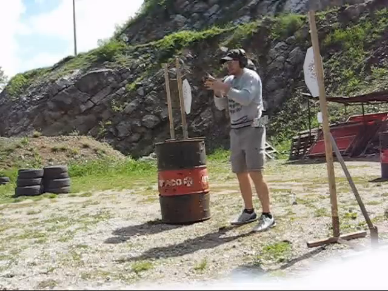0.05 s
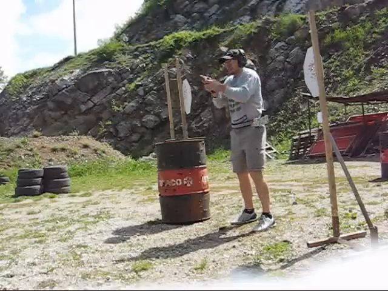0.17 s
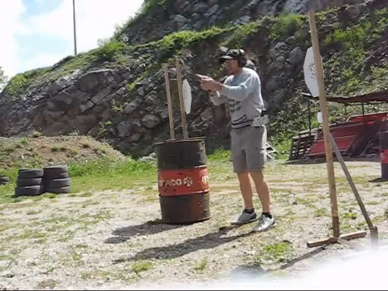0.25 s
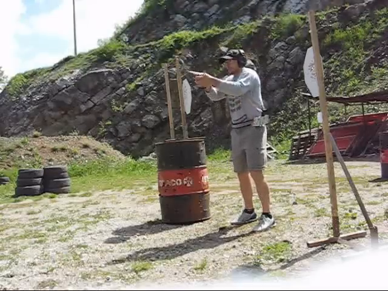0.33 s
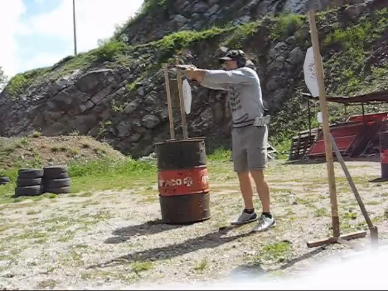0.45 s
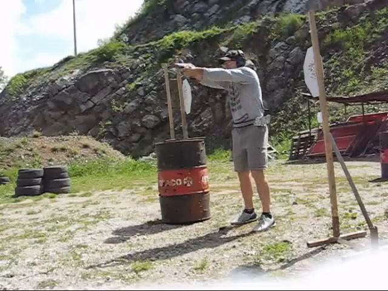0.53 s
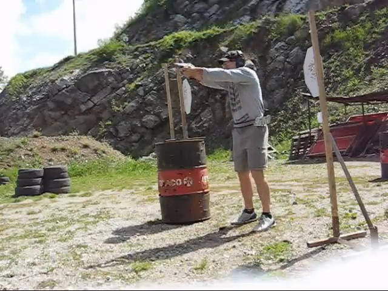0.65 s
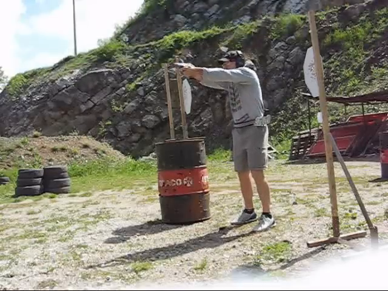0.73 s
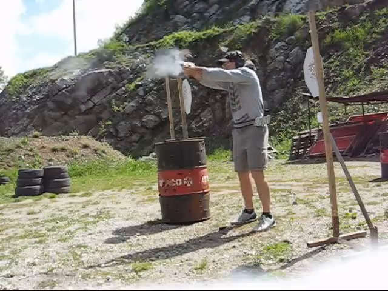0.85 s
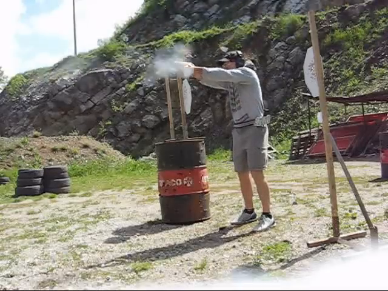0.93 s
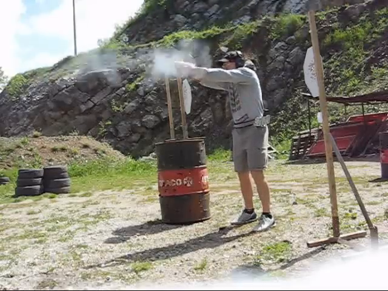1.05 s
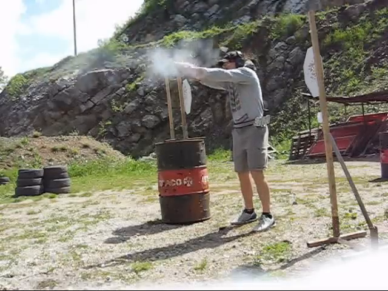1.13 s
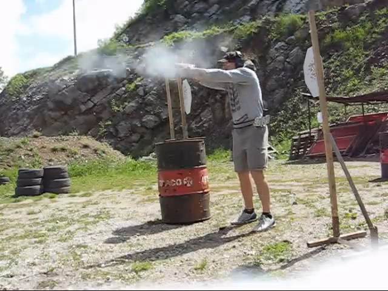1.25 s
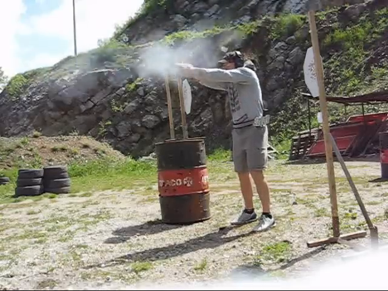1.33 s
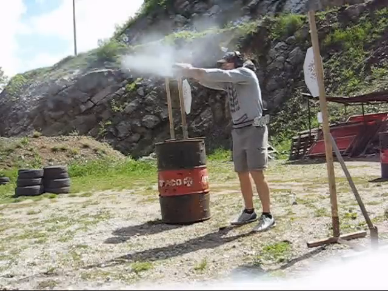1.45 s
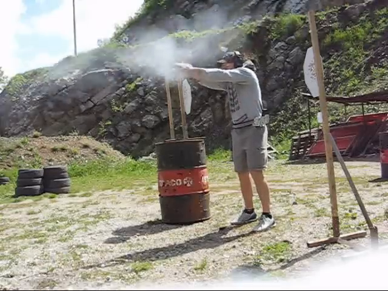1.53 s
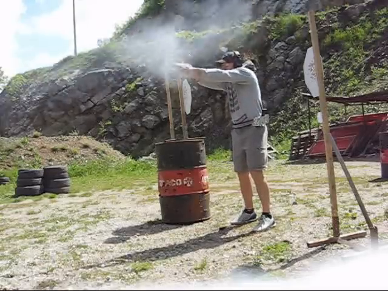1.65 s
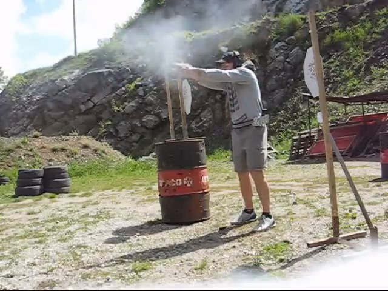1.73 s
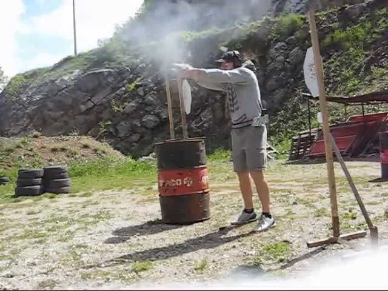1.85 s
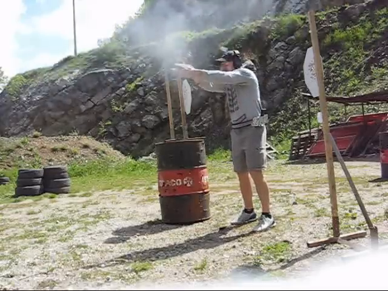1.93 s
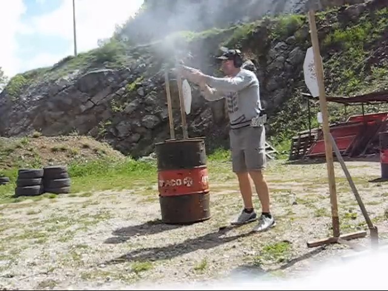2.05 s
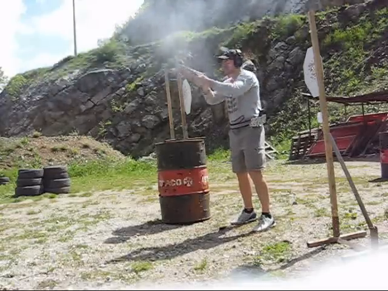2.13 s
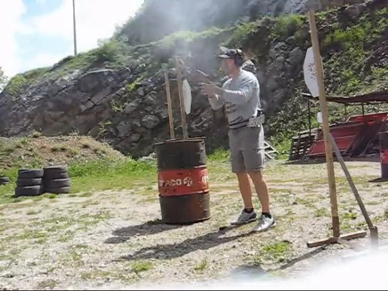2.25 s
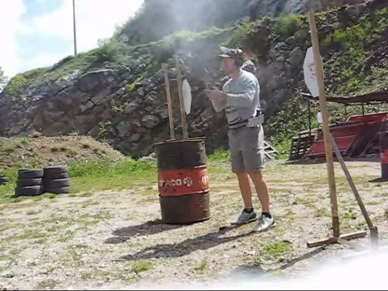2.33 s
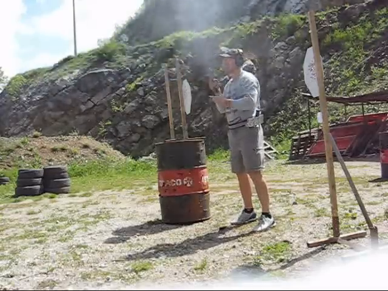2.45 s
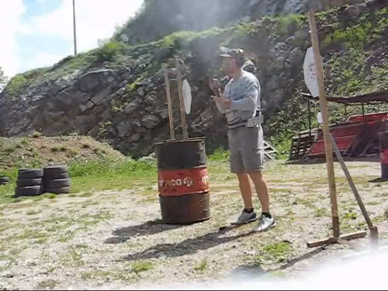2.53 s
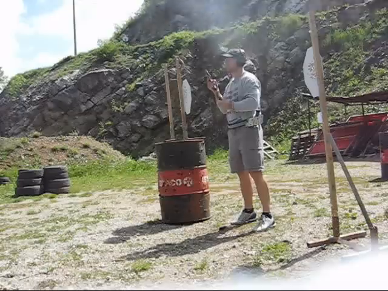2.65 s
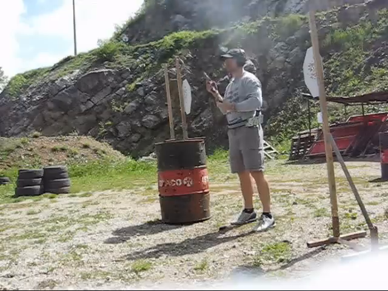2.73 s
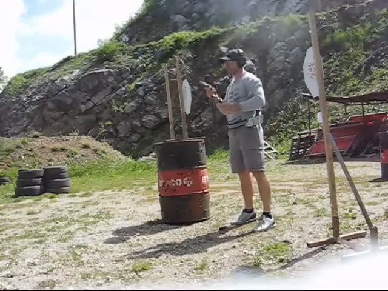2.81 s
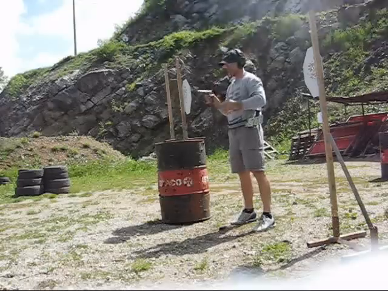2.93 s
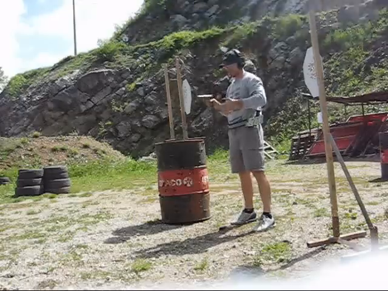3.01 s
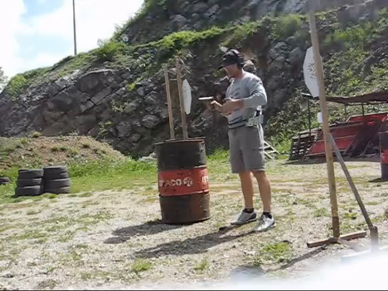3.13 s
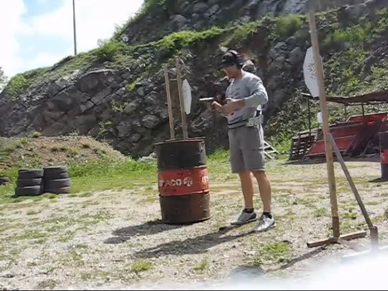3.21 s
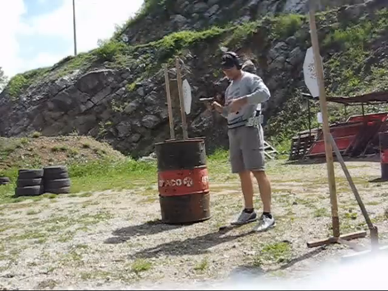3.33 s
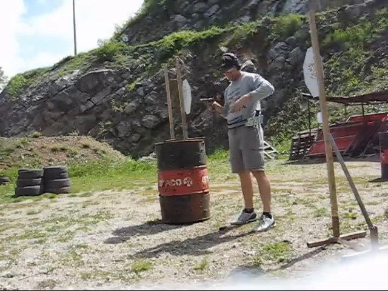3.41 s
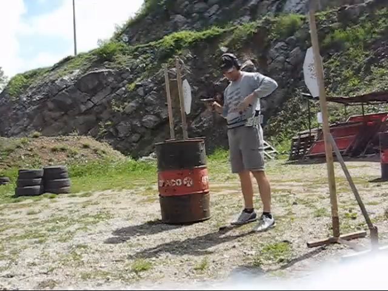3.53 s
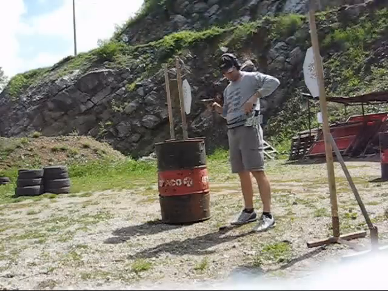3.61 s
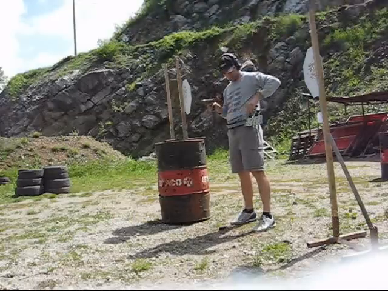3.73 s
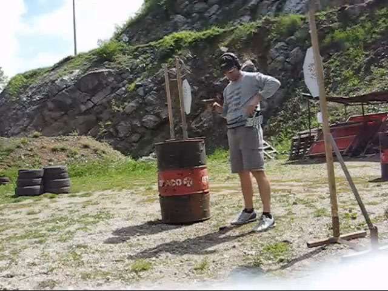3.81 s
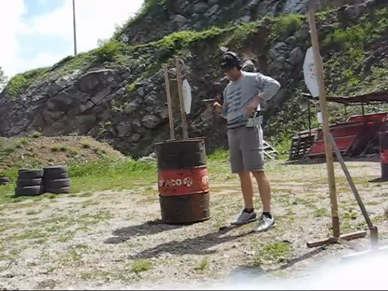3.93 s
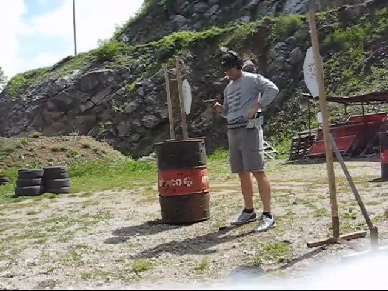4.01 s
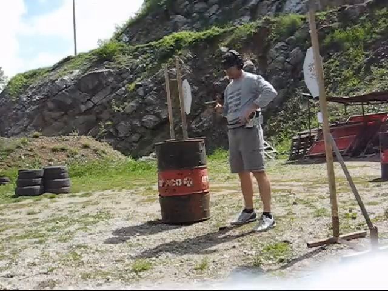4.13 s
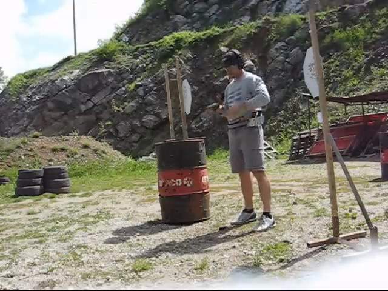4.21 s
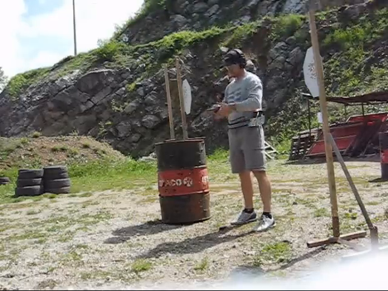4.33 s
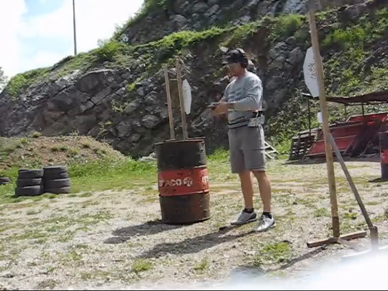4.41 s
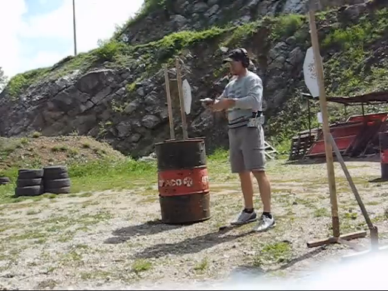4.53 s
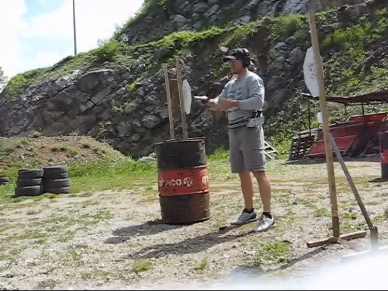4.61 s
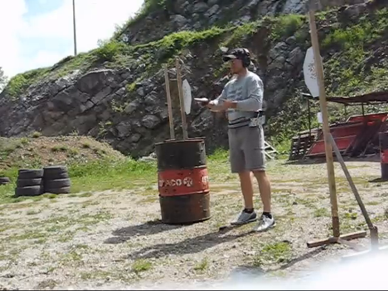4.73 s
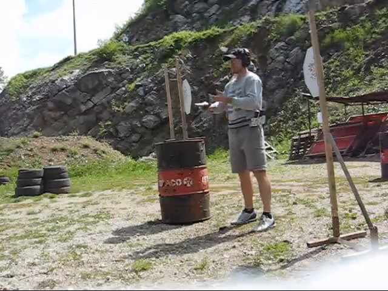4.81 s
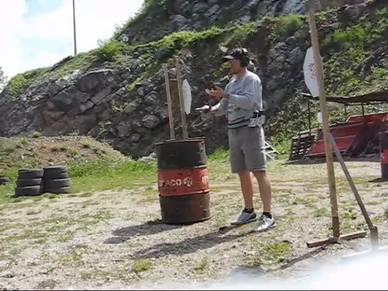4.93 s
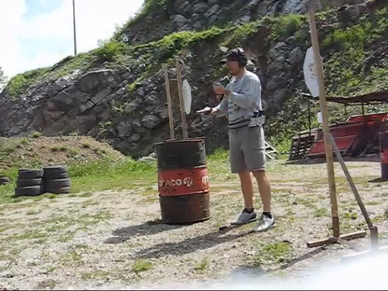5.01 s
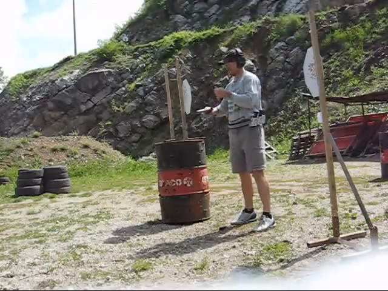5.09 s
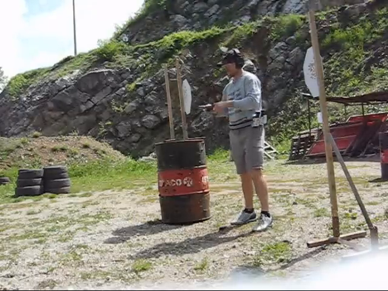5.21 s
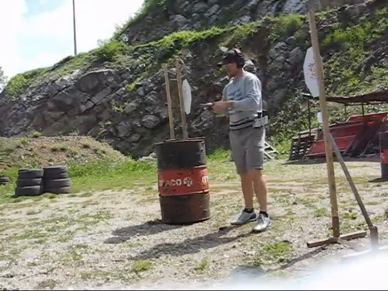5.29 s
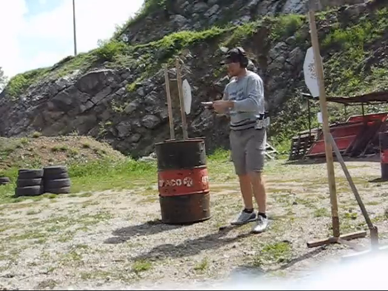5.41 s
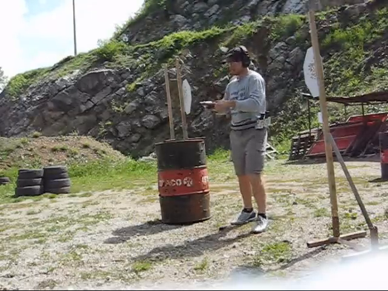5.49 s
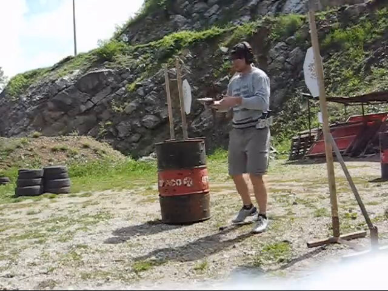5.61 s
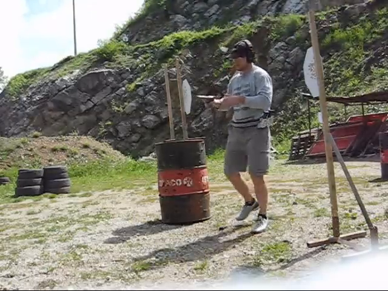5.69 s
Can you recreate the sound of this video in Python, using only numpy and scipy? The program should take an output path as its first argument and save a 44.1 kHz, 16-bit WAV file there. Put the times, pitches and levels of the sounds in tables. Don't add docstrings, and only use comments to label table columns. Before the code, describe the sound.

Gun parts click, four evenly spaced overloaded gunshots blast, a far rock face roars back, and gritty handling clicks follow in light wind.

```python
import sys
import numpy as np
from scipy import signal
from scipy.fft import rfft, irfft
from scipy.io import wavfile
from scipy.ndimage import uniform_filter1d

SR = 44100
rng = np.random.default_rng(int(sys.argv[2]) if len(sys.argv) > 2 else 0)


def store_wav(level_fs):
    pcm = np.round(np.clip(np.atleast_2d(level_fs), -1, 1) * 32767)
    wavfile.write(sys.argv[1], SR, pcm.T.astype(np.int16))


def attenuation_scalar(level_db):
    decades = np.asarray(level_db, float) / 20
    return 10 ** decades


N = 253562

# [t/s, strength/dB]
SHOTS = [
    (0.9226, 0),
    (1.1369, 0),
    (1.3515, 0),
    (1.5596, 0),
]


def white():
    return rng.standard_normal(N)


def unit(x):
    return x / np.sqrt(np.mean(x ** 2))


def band(x, lo_hz, hi_hz, order=2):
    return signal.sosfilt(signal.butter(order, [lo_hz, hi_hz], "band", fs=SR, output="sos"), x)


def colour(x, table):
    hz, db = np.transpose(table)
    grid = np.maximum(np.arange(2049) * SR / 4096, 1)
    log_gain = np.log(attenuation_scalar(np.interp(np.log(grid), np.log(hz), db)))
    cepstrum = irfft(log_gain)
    cepstrum[1:2048] *= 2
    cepstrum[2049:] = 0
    response = irfft(np.exp(rfft(cepstrum)))
    return signal.fftconvolve(x, response)[:len(x)]


def walk(rate):
    k = int(SR / rate)
    steps = np.repeat(rng.standard_normal(N // k + 1), k)
    return unit(uniform_filter1d(steps, k)[:N])


def scatter(table, treble_db, lumpy_db, bass_db=0, bass_hz=600, split_hz=1500):
    x = unit(colour(white() * attenuation_scalar(lumpy_db * walk(300)), table))
    low = signal.filtfilt(*signal.butter(1, split_hz, fs=SR), x)
    bass = signal.filtfilt(*signal.butter(2, bass_hz, fs=SR), low)
    middle = low - bass
    treble = x - low
    return bass * attenuation_scalar(bass_db) + middle + treble * attenuation_scalar(treble_db)


def add(out, s, x):
    i = int(s * SR)
    out[i:i + len(x)] += x[:N - i]


def ducking():
    # [t/s, drop/dB, recovery/s]
    drops = [(0.071, 6, 0.52), (0.322, 3, 0.55), (4.12, 10.5, 0.448), (4.574, 6.5, 0.529),
             (4.636, 7.5, 0.99), (5.60, 3, .4), (5.654, 7, .6), (5.733, 40, 1)]
    t = np.arange(N) / SR
    drop_db = 0
    for s, db, recovery_s in drops:
        onset = np.clip((t - s) / .004, 0, 1)
        recovery = np.clip(1 - (t - s) / recovery_s, 0, 1)
        drop_db = drop_db + db * onset * recovery
    return attenuation_scalar(-drop_db)


def camera():
    # [f/Hz, level/dB rms]
    motor = [
        (156.1, -57.5),
        (1184, -76),
        (2342, -68.5),
    ]
    t = np.arange(N) / SR
    hum = sum(np.sqrt(2) * attenuation_scalar(db) * np.sin(2 * np.pi * hz * t) for hz, db in motor)
    since = t - SHOTS[0][0]
    dip_db = 14 * (since > 0) * np.clip(1 - since / 2, 0, 1)
    hiss = unit(band(white(), 300, 4000, order=1)) * attenuation_scalar(-62 + 2.0 * walk(35))
    gain = ducking()
    return hum * attenuation_scalar(-dip_db) * gain ** .3 + hiss * gain ** .04


def wind():
    # [t/s, peak level/dB, time to fade by 20 dB/s]; a negative time swaps rise and fade
    gusts = [(.02, -70.5, -2), (.315, -54, 0.1), (.7, -66, 2.7), (1.8, -60.5, 0.7), (2.27, -37, .04),
             (2.35, -34, -0.4), (2.44, -35, 0.5), (2.61, -35.5, 0.21), (2.72, -49.5, .5), (3.0, -39, 0.32),
             (3.22, -40.5, .15), (3.439, -33, -0.06), (3.52, -47.5, -2), (3.74, -45, 0.73),
             (3.87, -41.5, 0.64), (3.989, -43.5, 0.6), (4.12, -47, -0.6), (4.21, -48, 0.2178),
             (4.359, -52, -0.28), (4.5, -53, 0.34), (4.64, -54.5, -0.52), (4.9, -54, .03),
             (5.005, -44.5, 0.1), (5.108, -45, 0.02), (5.23, -51.5, 0.1), (5.385, -44.5, 0.61),
             (5.5, -49.5, 0.9), (5.66, -57.5, .03)]
    # [t/s, peak level/dB, f/Hz]
    thumps = [(2.258, -36, 68.8), (2.337, -34.5, 78.5), (2.447, -37, 93.5), (2.597, -31.5, 52.9),
              (3.018, -30.5, 78), (3.179, -22.5, 59.8), (3.441, -29.5, 37.84), (4.21, -37, 53.44),
              (4.877, -42, 72), (4.988, -35, 89.4), (5.098, -42, 63.3), (5.231, -47, 52.7),
              (5.376, -32, 108)]
    rise_share, calm_db = .45, -84
    rumble = unit(band(white() * attenuation_scalar(4 * walk(30)), 22, 120))
    t = np.arange(N) / SR
    swell_db = []
    for s, db, fade_s in gusts:
        away = np.maximum((t - s) / fade_s, (s - t) / (fade_s * rise_share))
        swell_db.append(db - 20 * away)
    out = rumble * attenuation_scalar(np.maximum(np.max(swell_db, axis=0), calm_db))
    for s, db, hz in thumps:
        t = np.arange(int(1.8 * SR / hz)) / SR
        add(out, s, -attenuation_scalar(db) * np.sin(2 * np.pi * hz * t) * np.hanning(len(t)))
    return out


def scrapes():
    # [start t/s, end t/s, level/dB]
    slides = [(0, 0.054, -45.5), (3.96, 4.114, -47), (4.509, 4.531, -43), (4.648, 4.728, -57.5),
              (5.404, 5.541, -53.5), (5.647, 5.681, -49)]
    swell_db = 8.5
    t = np.arange(N) / SR
    gain = 0
    for start, end, db in slides:
        left = np.clip((end - t) / (end - start), 0, 1)
        gain = gain + (t > start) * (t < end) * attenuation_scalar(db - swell_db * left)
    return gain * unit(band(white() * attenuation_scalar(3 * walk(150)), 1970, 5460))


def clicks():
    # [t/s, peak level/dB, ring f/Hz, time to fade by 60 dB/s]
    ticks = [(.0523, -20.5, 4595, 0.049), (.0568, -22.5, 5293, 0.091), (.0709, -26, 5300, 0.04),
             (.2804, -28, 2400, 0.055), (.2959, -20, 4470, 0.038), (.3054, -16.5, 4140, 0.026),
             (.3111, -19, 3938, 0.07), (3.2557, -23.5, 2530, 0.034), (3.8016, -13.5, 3370, 0.013),
             (3.803, -22, 1670, .04), (3.9025, -19.5, 4160, 0.015), (3.904, -24, 1550, 0.0476),
             (4.115, -16.5, 4050, 0.023), (4.5264, -20, 4060, 0.033), (4.5404, -35.5, 2070, 0.14),
             (4.57, -14.5, 2240, 0.021), (4.632, -29.5, 3420, .03), (4.648, -34, 2200, .063),
             (5.4848, -37, 2550, .04), (5.53, -30.5, 2930, 0.036), (5.5425, -19, 2320, 0.018),
             (5.559, -28, 2240, 0.067), (5.597, -15.5, 2184, 0.028), (5.6308, -32, 4040, .036),
             (5.6502, -19.5, 3894, .041), (5.6668, -34.5, 4270, 0.0558)]
    # [t/s, peak level/dB, ring f/Hz, time to fade by 60 dB/s]
    clacks = [(.0662, -18, 3730, 0.015), (.319, -19.5, 2328, 0.019), (.9168, -32, 3500, .05),
              (2.5313, -22.5, 4500, 0.056), (2.5445, -21.5, 2480, 0.035), (3.7904, -26.5, 2360, 0.0136),
              (3.921, -35, 3346, 0.036), (4.5174, -33.5, 4350, 0.046), (4.558, -21.5, 4328, 0.021),
              (4.6344, -18, 2840, 0.017), (4.636, -23, 1424, 0.034), (5.307, -31, 718, 0.055),
              (5.3243, -25.5, 2742, 0.022), (5.425, -36, 1023, .053), (5.447, -28, 1000, 0.031),
              (5.6414, -31, 4404, 0.0366), (5.6544, -23, 4080, 0.0275)]
    # [f/Hz, level over the crack/dB]
    steel = [
        (2250, -14.5),
        (3400, -5),
        (4350, -4.5),
    ]
    out = np.zeros(N)
    t = np.arange(3000) / SR
    for table, body_db, hard_db in [(ticks, -13, -7), (clacks, -5, -8)]:
        for s, db, hz, t60 in table:
            a, b, c = rng.standard_normal((3, len(t)))
            crack_db = hard_db + 19.5 * min(np.log2(hz / 1500), 0)
            fade = attenuation_scalar(-60 * t / max(t60, .005)) * np.minimum(t / 0.000087, 1)
            frame = sum(unit(band(a, f * .96, f * 1.04, order=1)) * attenuation_scalar(g) for f, g in steel)
            crack = (unit(band(a, 1500, 7000)) + frame) * attenuation_scalar(crack_db - 4.5)
            pure_ring = np.sin(2 * np.pi * hz * t) * attenuation_scalar(-9.5)
            rough_ring = unit(band(b, hz * .94, hz * 1.06, order=1)) * attenuation_scalar(-12.5)
            body = unit(band(c, 380, 1050, order=1)) * attenuation_scalar(body_db - 3.0)
            add(out, s, attenuation_scalar(db) * fade * (crack + pure_ring + rough_ring + body))
    return out


def valley():
    # [t/s, level/dB]
    roar = [(0.0, -44.5), (0.51, -47.5), (0.75, -44.5), (0.92, -47), (0.98, -55), (1.1, -35.5), (1.28, -36),
            (1.63, -48), (1.8, -38), (1.88, -26), (2.18, -23.5), (2.56, -25), (3.06, -35.5), (4.03, -48),
            (4.7, -50.5), (4.95, -57), (5.5, -52), (5.75, -66.5)]
    # [f/Hz, level/dB per Hz]
    rock = [(150, -49), (250, -22), (442, -7.5), (523, -3.5), (634, -4), (822, -1.5), (985, -11),
            (1150, -9), (1530, -15), (2310, -20), (5500, -34), (7150, -72), (12100, -120)]
    # [t/s, rise/dB, fade/s]
    surges = [
        (2.19, 6, 0.33),
        (2.418, 9.5, 0.009),
    ]
    loud_db = -25.5
    t = np.arange(N) / SR
    surge_db = sum(db * (t > s) * np.exp(-abs(t - s) / fade) for s, db, fade in surges)
    roar_s, roar_db = np.transpose(roar)
    over_db = np.interp(t, roar_s, roar_db) - loud_db
    front_db = 4.5 * np.exp(-abs(t - 1.9) / 0.73)
    rustle_db = .5 * np.clip(-12 - over_db, 0, 12)
    treble_db = -3 + rustle_db + front_db - surge_db
    bass_db = -1 - 0.19 * over_db - .5 * surge_db
    level_db = loud_db + over_db + surge_db
    patchy_db = 0.7 * walk(25) + 0.53 * walk(70)
    return scatter(rock, treble_db, 1.2, bass_db) * attenuation_scalar(level_db + patchy_db)


def sizzle():
    late_swell = (1.84, -2)
    t60 = 1.3
    t = np.arange(N) / SR
    power = sum((t > s) * attenuation_scalar(db - 60 * abs(t - s) / t60) ** 2 for s, db in [*SHOTS, late_swell])
    return np.sqrt(power) * attenuation_scalar(-36.5 + 2.0 * walk(60)) * unit(band(white(), 2840, 6500))


def near_echo_db():
    # [delay/s, level/dB, hold/s, time to fade by 60 dB/s]
    returns = [(0, -7, .0285, .018), (.029, -16, .011, 0.0283), (0.047, -20.5, 0.003, 0.16),
               (0.074, -26, .01, 0.51), (0.131, -31, 0.044, 0.2), (.195, -22.5, .002, .06),
               (0.202, -31.5, 0.0056, 0.9)]
    t = np.arange(N) / SR
    power = 0
    for s, db, hold, t60 in returns:
        rise = np.clip((t - s) / .002 + (s == 0), 0, 1)
        fade_db = 60 * np.clip(t - s - hold, 0, 1) / t60
        power = power + rise * attenuation_scalar(db - fade_db) ** 2
    return 10 * np.log10(power + 1e-9)


def shots():
    # [f/Hz, level/dB per Hz]
    blast = [(90, -45), (150, -16.5), (230, -7.5), (370, -4), (460, -5), (620, -0.5), (810, -2),
             (1000, -8.5), (1300, -7.5), (2070, -15), (5500, -22.5), (7150, -44), (12000, -120)]
    # [delay/s, level/dB]
    slaps = [(.0335, -4), (.0378, -5), (.0525, -8), (.0605, -10), (.0815, -14), (.160, -15), (.196, -15)]
    # [f/Hz, level/dB, time to fade by 60 dB/s]
    drum = [(269, -14, 0.12), (355, -15.5, 0.13), (623, -25, 0.11), (814, -8, 0.15), (1329, -11.5, 0.077)]
    level_db = near_echo_db()
    n = int(.34 * SR)
    treble_db = 0.5 + 3 * np.exp(-np.arange(N) / SR / 0.00467)
    same = (scatter(blast, treble_db, 0.84) * attenuation_scalar(level_db))[:n]
    t = np.arange(300) / SR
    wave = (1 - t / .0003) * np.exp(-t / .0003)
    add(same, 0, -attenuation_scalar(-4) * wave)
    slap = band(wave, 400, 1400)
    slap = slap / abs(slap).max()
    for s, db in slaps:
        add(same, s, -attenuation_scalar(db) * slap)
    lag = np.arange(n) / SR
    for hz, db, t60 in drum:
        same = same + attenuation_scalar(db - 60 * lag / t60) * np.sin(2 * np.pi * hz * lag)
    out = np.zeros(N)
    for s, db in SHOTS:
        own = (scatter(blast, 5 + treble_db, 1.5) * attenuation_scalar(level_db - 11))[:n]
        add(out, s, attenuation_scalar(db) * (same + own))
    return out


def scene():
    background = camera() + wind() + scrapes() + clicks()
    echoes = ducking() * valley() + sizzle()
    return (background + echoes + shots())[None]


def band_limit(x):
    return signal.sosfilt(signal.butter(12, 16640, fs=SR, output="sos"), x)


def record(dry):
    rate_hz, hold_start, step = 11026, 2.75, 1 / 128
    x = 0.3283 * np.tanh(dry[0] / 0.33)
    x = signal.lfilter([1, -1], [1, -np.exp(-2 * np.pi * 30 / SR)], x)
    x = signal.sosfilt(signal.butter(3, 6000, fs=SR, output="sos"), x)
    tick = np.floor((np.arange(N) - hold_start) * rate_hz / SR)
    index = np.clip(tick * SR / rate_hz + hold_start, 0, N - 1).astype(int)
    held = step * np.round(x[index] / step + .08)
    y = signal.sosfiltfilt(signal.ellip(6, .1, 40, 15700, fs=SR, output="sos"), held)
    return band_limit(y[None])


dry = scene()
out = record(dry)
store_wav(out)
```